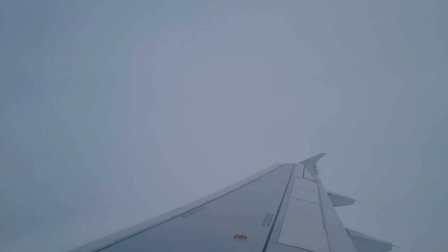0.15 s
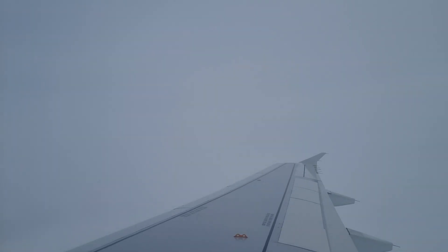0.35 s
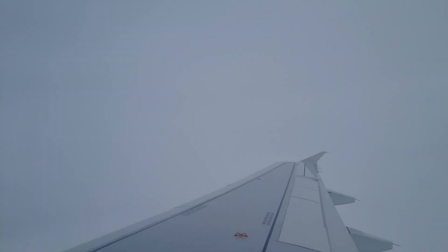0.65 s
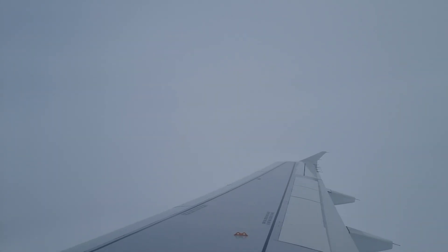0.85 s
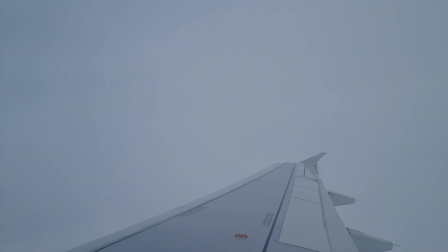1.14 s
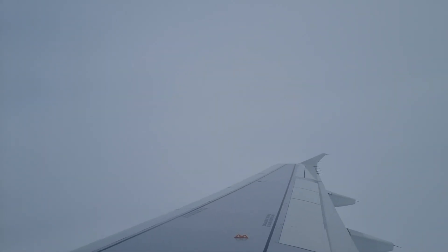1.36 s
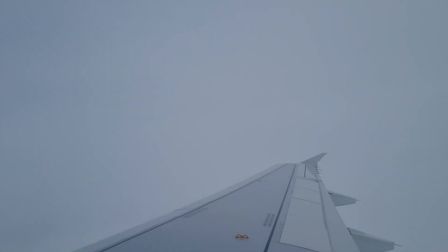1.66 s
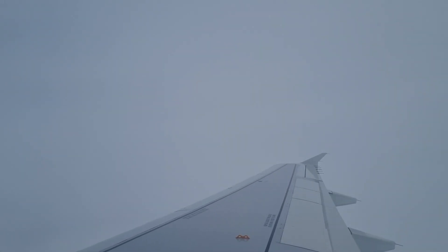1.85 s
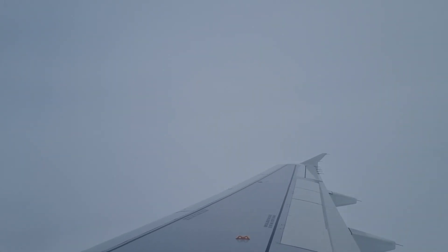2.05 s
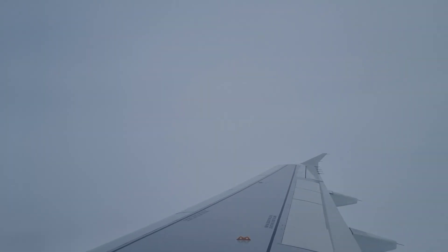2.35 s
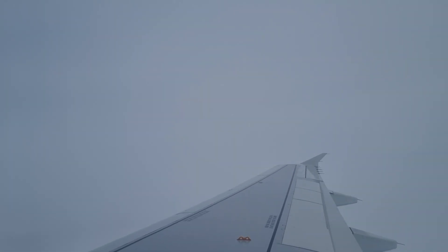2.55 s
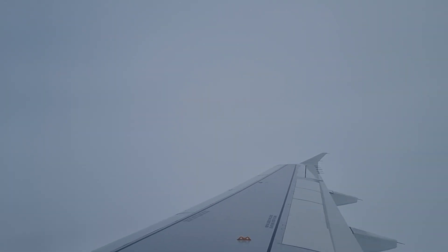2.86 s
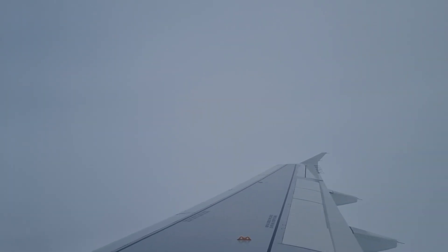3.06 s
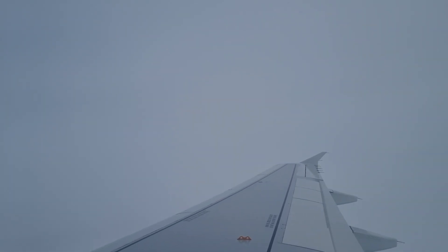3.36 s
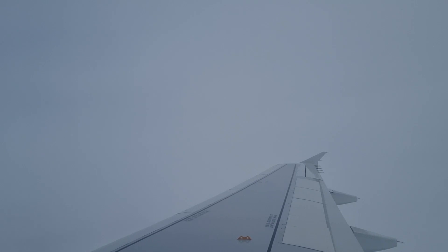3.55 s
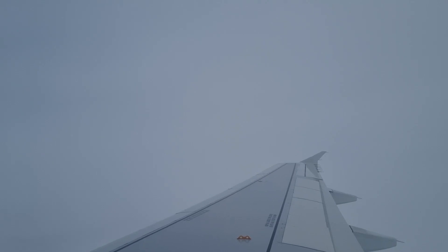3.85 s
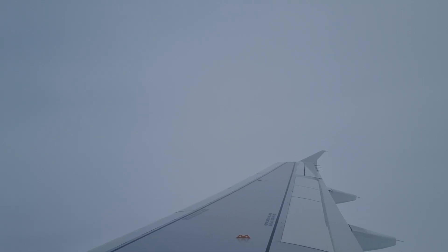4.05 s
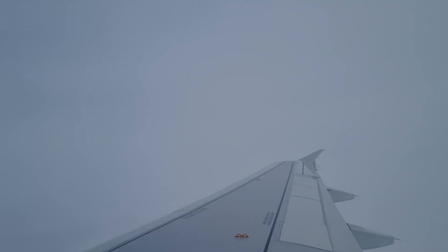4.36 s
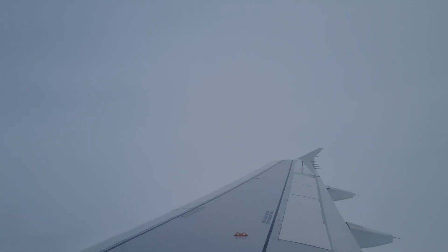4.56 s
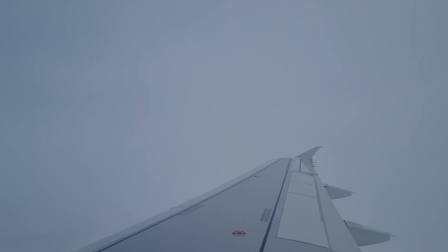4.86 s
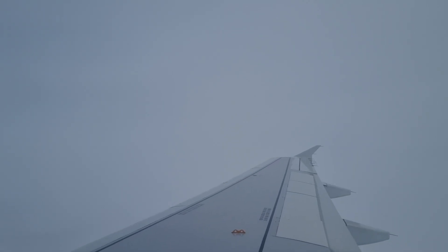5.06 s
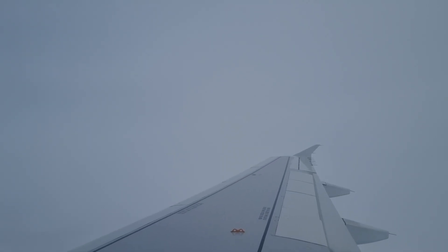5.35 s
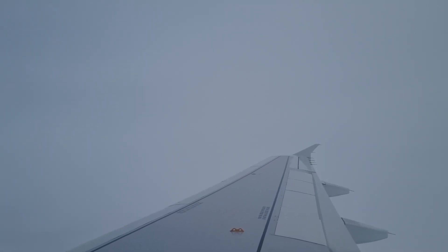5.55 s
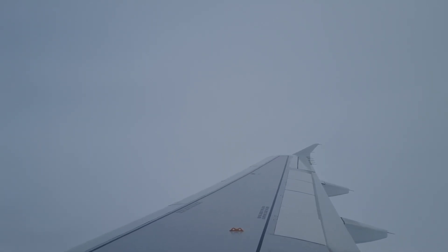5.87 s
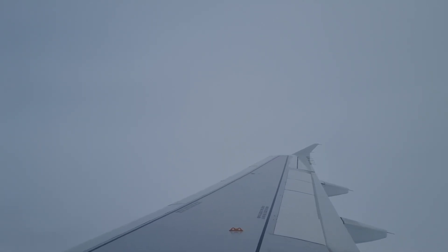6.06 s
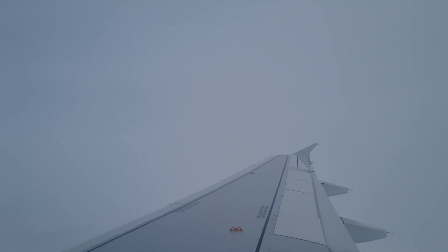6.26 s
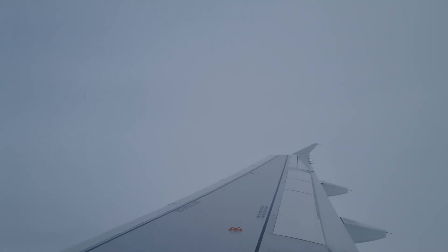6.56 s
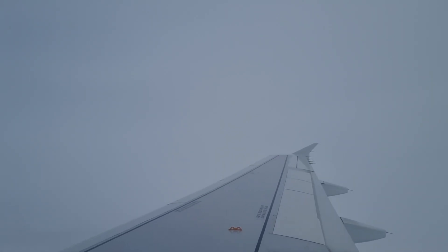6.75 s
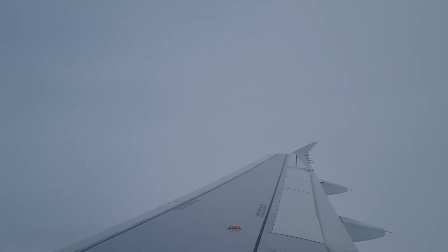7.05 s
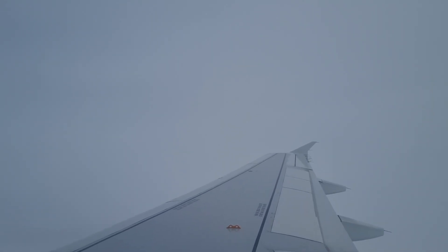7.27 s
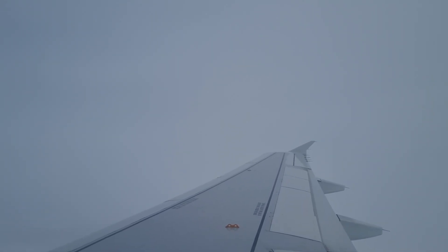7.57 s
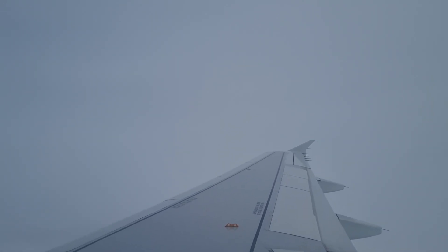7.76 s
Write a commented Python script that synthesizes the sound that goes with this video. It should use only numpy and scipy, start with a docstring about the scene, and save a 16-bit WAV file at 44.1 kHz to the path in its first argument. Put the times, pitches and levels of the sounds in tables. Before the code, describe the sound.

For about 8 seconds we hear the inside of an airliner climbing through cloud, from a window seat. A loud, pure, very deep hum around 72 Hz holds steady and dominates, wrapped in dense rumble mostly below 500 Hz. Weaker steady tones near 130, 230 and 530 Hz give a droning, slowly beating colour, with a very faint whine above 1 kHz. Muffled airflow and thin vent hiss lie far underneath, slightly stronger at the start. Tiny soft high swishes pass near 0.1, 0.2, 0.8, 2.2 and 6.9 s. At 5.6 s a short dry scuff close by is followed at 5.7 to 6.0 s by a hissy rubbing stroke of shifting colour, then light touches at 6.0 and 6.3 s and a fainter brush to about 6.5 s. The drone continues unchanged to the end. Close stereo microphones, wide low rumble, no evident echo.

```python
"""The fan shaft hums with its buzz-saw orders inside an airliner cabin during the climb, heard by a window:
sums of sines at shaft multiples, with accessory and core-shaft tones, paired engines beating slowly.
Jet rumble and airflow come through the wall and air vents hiss: shaped noise, partly shared by the ports.
Something is rubbed close by: friction hiss excites resonances by contact place. Faint swishes are short
puffs of band noise. Two microphone ports stand a hand apart."""
import sys
import numpy as np
from scipy import signal
from scipy.fft import rfft, irfft, next_fast_len
from scipy.io import wavfile
from scipy.ndimage import uniform_filter1d, map_coordinates

SR = 44100
rng = np.random.default_rng(int(sys.argv[2]) if len(sys.argv) > 2 else 0)


def unload_audio(sound):
    """Save the sound as a 16-bit wav file, at the path given as the first command line argument."""
    columns = np.transpose(np.atleast_2d(sound))
    # keep every value between -1 and 1, then stretch to whole-number steps
    steps = np.round(np.clip(columns, -1, 1) * 32767)
    wavfile.write(sys.argv[1], SR, steps.astype(np.int16))


N = 348831

# In all tables left_minus_right_db and left_lead_rad compare the two ports; levels in db are rms.
# Fan shaft speed: time_s, speed_hz
FAN_SPEED = [(0, 71.52), (7.91, 71.56)]
# Shaft multiples from uneven blade-tip shocks: order, level_db, left_minus_right_db, left_lead_rad
FAN_ORDERS = [(1, -13.5, -.6, .2), (4, -32, -3, .2), (9, -53, -3, 1.9), (12, -51, 2, 2.9),
              (14, -54, 2, 2.2), (15, -49, 0, 3.1), (16, -60, 1, 3.5), (17, -56, -2, 3.8),
              (22, -64, -5, 3.9), (36, -70, 1, 0), (41, -74, 4, 1.9)]
# Accessory shaft speed: time_s, speed_hz
ACCESSORY_SPEED = [(0, 132.68), (7.91, 132.61)]
# Pump and generator on that shaft: order, level_db, left_minus_right_db, left_lead_rad
ACCESSORY_ORDERS = [(1, -38, -1, .5), (8, -52, 2, 2.9), (9, -41.5, -3, 2.3), (12, -51, -5.5, 3.5),
                    (16, -66, -1, 5)]
# Core shafts and pumps of both engines, nearly in tune: in_step_s, then for each engine
# (pitch_hz, level_db, left_minus_right_db, left_lead_rad)
ENGINE_PAIRS = [(.46, (230.3, -28.8, -3.9, .2), (230.78, -32.9, -.6, .1)), (0, (530.58, -40.7, -4.9, 1.3),
                (531.7, -42, -2.4, 1.6))]
# Steady single tones: pitch_hz, level_db, left_minus_right_db, left_lead_rad
WHINES = [(1288.7, -57, -1, 4.5), (1248.6, -63, 2, 2.7), (1299.4, -61, 8, 1.9), (1449.8, -63, 2, 2.4),
          (1461.6, -66, -6, 2.7), (11999.5, -92, -2, 0), (12800.5, -89, 7, 0)]

# Jet rumble through floor and wall:
# frequency_hz, density_db_per_hz, left_minus_right_db, likeness_0_to_1, left_lead_rad
JET_RUMBLE = [(20, -60.5, -4, .9, .1), (32, -57, -4.5, 0.91, .3), (46.5, -42.5, 0.7, 1, .3),
              (91, -37, -1.3, .98, .2), (139, -43.5, 0, 0.93, .2), (162.4, -38, -1.5, 0.95, .01),
              (202.7, -45.5, -1.7, 1, .1), (250, -47, -3, 0.74, .01), (324, -44, -2, 0.83, .1),
              (412.3, -48.5, -5.5, 0.54, 1.74), (456, -55, 0, 0.3, 1.7), (529, -50, -6.5, .51, 1.27),
              (584, -61, 0, .44, 2.5), (796, -86.5, -5.5, 1, 2.7)]
# Airflow along the skin; a standing wave across the ports turns them against each other: same columns
SKIN_AIRFLOW = [(400, -87, -1, .44, 2.5), (600, -63, -1, 0.37, 2.64), (757, -57.5, 0.5, 0.67, 3.1),
                (962, -63.5, 0, 0.77, 3.1), (1350, -70, 1, 0.62, 3.5), (1450, -74, 1.5, .57, 3.1),
                (2030, -76.5, -3, 0.11, 2.9), (2270, -81.5, -2, .07, 2.8), (2580, -79.5, 2.5, 0.15, .1),
                (3130, -80.5, 0, 0.18, 3.4), (3570, -85.5, -0.2, .21, 3.1), (4050, -90.5, -0.5, .2, 3.1),
                (4500, -105, -0.3, .2, 3.1)]
# Air vents, reaching the left port first: same columns
AIR_VENTS = [(3000, -105, -1.5, .2, .1), (3900, -87.5, -1.5, 0.22, .1), (4500, -90.5, -2.5, 0.4, .1),
             (5630, -95.5, -0.5, .27, .1), (6400, -93.5, -1, .25, .1), (6900, -95.5, 1.8, .3, .1),
             (7600, -95.5, -1.8, .2, .1), (8660, -99.5, 6, .2, .1), (10100, -102, 2.5, .2, .1),
             (11000, -106, -2.5, .2, .1), (11800, -107, 1, .2, .1), (12400, -104, 1, .2, .1),
             (15700, -108, 2.5, .16, .1)]
VENT_LEAD_S = 0.000563
# Slow drift of airflow and vents: time_s, level_db
FLOW_DRIFT = [(0, 0.85), (1.5, 0.2), (3.5, -0.43), (5.5, 0.04), (7.91, 0.1)]

# Relative spectrum of the friction hiss: frequency_hz, density_db_per_hz
FRICTION_SPECTRUM = [(1200, -25.5), (3300, 3.5), (5000, -2), (8500, -4.5), (10000, -7.5), (12500, -7.5),
                     (15500, -10)]
# Resonances of the rubbed thing, relative levels:
# pitch_hz, width_hz, level_db, left_minus_right_db, best_place_0_to_1
RESONANCES = [(1900, 150, 3.5, -3, 0.6), (3420, 320, 5, -3.5, 0.2), (3700, 250, 1, 0, .5),
              (4780, 300, 0, -4, 0.7), (5200, 400, -3.5, 0, 0.9), (5740, 400, 2, -5, 0.2),
              (6300, 550, -2, -5, 0.9), (7700, 650, 0, -4, 0.72), (8500, 740, 2.5, 4.5, .05),
              (8820, 450, 1.5, 6, .5), (10300, 320, -7, -2, .8), (11000, 500, -2, 3.5, .2),
              (12200, 400, -4.5, -2.5, .75), (12600, 900, 0.5, -1.5, .05), (13700, 750, 1.5, 0.5, .55),
              (14500, 800, 0, 4, .4), (15200, 500, -4, 2, .55)]
# Strokes: start_s, length_s, peak_level_db, first_place_0_to_1, last_place_0_to_1
RUB_STROKES = [(5.638, .026, -41.5, .05, .08), (5.72, .25, -46.5, .4, 0.98), (6.03, .015, -52, .75, .7),
               (6.274, .014, -49, .15, .2), (6.35, .12, -58, .75, .9)]
RING_SHARE, RING_PER_S = .4, 1.5  # power share of ringing: base, and growth per s of stroke length
REACH = 0.38  # distance from the best place, 0-1, at which a resonance's drive falls to 1/e
SLIP_DB, FLICKER_DB = 0.9, 2.2  # level variation: stick and slip; each resonance on its own
PRESS_S, LIFT_S = .024, .018  # Gaussian rise before a stroke, exponential fall after it
ARCH_DB_PER_S = 16  # drop from the middle of a stroke to its ends, per s of length

# Faint swishes: peak_s, length_s, centre_hz, peak_level_db
SWISHES = [(0.074, .04, 12970, -59), (.23, .05, 8500, -59), (.77, .065, 6500, -59),
           (0.863, .02, 13000, -68), (2.17, .06, 7500, -58), (3.109, .02, 12900, -65),
           (6.87, .07, 7970, -63), (7.814, .03, 11000, -61)]
SWISH_BAND, SWISH_PAN_DB = .4, -1  # band scale over centre frequency; left minus right
# Chance swishes: mean rate, then typical length, centre frequency and peak rms level
STRAY_PER_S, STRAY_S, STRAY_HZ, STRAY_DB = 1, .04, 8000, -69

TOP_HZ = 15750


def engines():
    """Periodic sources radiate line spectra: rotation gives harmonic orders, other parts give single tones."""
    t = np.arange(N) / SR
    fan_hz, = columns(FAN_SPEED, t)
    accessory_hz, = columns(ACCESSORY_SPEED, t)
    hum = tones(FAN_ORDERS[:1], fan_hz, waver_db=.2, waver_rad=.05, rate=1.5)
    buzz = tones(FAN_ORDERS[1:], fan_hz, waver_db=.8, waver_rad=.2, rate=1.5)
    accessories = tones(ACCESSORY_ORDERS, accessory_hz, waver_db=.8, waver_rad=.15, rate=2.5)
    # on a 1 Hz base, the order is the pitch in Hz
    whines = tones(WHINES, np.ones(N), waver_db=1, waver_rad=.15, rate=2.5)
    return hum + buzz + accessories + twins() + whines


def tones(rows, base_hz, waver_db, waver_rad, rate):
    """Harmonic synthesis: multiples of a base speed waver in level and phase through the structure."""
    phase = 2 * np.pi * np.cumsum(base_hz) / SR
    out = np.zeros((2, N))
    for order, db, pan_db, lead in rows:
        turn = order * phase + rng.uniform(0, 2 * np.pi) + waver_rad * wobble(rate)
        size = np.sqrt(2) * amp(db) * unit(amp(waver_db * wobble(rate)))
        out += size * ports(pan_db)[:, None] * np.sin([turn + lead / 2, turn - lead / 2])
    return out


def twins():
    """Interference of two engines a fraction of a hertz to about one hertz apart: a slow beat."""
    out = np.zeros((2, N))
    for in_step_s, *pair in ENGINE_PAIRS:
        t = np.arange(N) / SR - in_step_s
        start = rng.uniform(0, 2 * np.pi)
        for hz, db, pan_db, lead in pair:
            turn = 2 * np.pi * hz * t + start
            out += np.sqrt(2) * amp(db) * ports(pan_db)[:, None] * np.sin([turn + lead / 2, turn - lead / 2])
    return out


def air():
    """Turbulence radiates broadband noise: rumble, skin airflow and vents, each drifting slowly."""
    flow_db, = columns(FLOW_DRIFT, np.arange(N) / SR)
    rumble = amp(0.9 * wobble(1.1)) * rush(JET_RUMBLE, patchy_db=0.5, walls_db=0)
    skin = amp(flow_db + 0.24 * wobble(0.84)) * rush(SKIN_AIRFLOW, patchy_db=0.78, walls_db=0.95)
    vent_gain = amp(flow_db + .3 * wobble(2.6) + .4 * wobble(13))
    vents = vent_gain * rush(AIR_VENTS, patchy_db=1.5, walls_db=1.6, lead_s=VENT_LEAD_S)
    return rumble + skin + vents


def rush(rows, patchy_db, walls_db, lead_s=0):
    """Partial coherence: each port hears a phase-shifted shared noise and an independent one."""
    z = signal.stft(rng.standard_normal((3, N)), nperseg=1024)[2]
    # random patches, smoothed over frequency and then time
    field = uniform_filter1d(rng.standard_normal(z.shape[1:]), 6, 0)
    field = uniform_filter1d(field, 10, 1)
    # reflections add fixed ripples over frequency
    ripples = uniform_filter1d(rng.standard_normal((3, z.shape[1], 1)), 3, 1)
    z *= amp(walls_db * unit(ripples))
    patchy = signal.istft(z * amp(patchy_db * unit(field)), nperseg=1024)[1][:, :N]
    shared, *own = unit(patchy)

    def colour(hz, common):
        """Coherence divides the spectral power between shared and independent noise."""
        db, pan_db, alike, lead = on_log_hz(rows, hz)
        alike = np.clip(alike, 0, 1)
        gain = amp(db) * np.sqrt(SR / 2) * ports(pan_db)
        if not common:
            return gain * np.sqrt(1 - alike)
        turn = lead / 2 + np.pi * hz * lead_s
        return gain * np.sqrt(alike) * np.exp(1j * np.array([turn, -turn]))

    together = filtered(shared, lambda hz: colour(hz, True))
    return together + filtered(np.array(own), lambda hz: colour(hz, False))


def rubbing():
    """Friction excites modes: as the contact slides along, it wakes one resonance after another."""
    hiss, fresh = (from_left(lambda hz: amp(on_log_hz(FRICTION_SPECTRUM, hz)[0])) for _ in range(2))
    begin = round((RUB_STROKES[0][0] - 4 * PRESS_S) * SR)
    end = round((sum(RUB_STROKES[-1][:2]) + 6 * LIFT_S) * SR)
    near = np.arange(begin, end)  # samples spanning the strokes
    t, f = near / SR, np.fft.rfftfreq(len(near), 1 / SR)
    grain = amp(SLIP_DB * wobble(140)[near])  # the contact sticks and slips
    spectrum = rfft(hiss[:, near])
    modes = []
    for hz, width_hz, _, pan_db, _ in RESONANCES:
        band = (1j * f * width_hz / (hz * hz - f * f + 1j * f * width_hz)) ** 2
        mode = unit(irfft(spectrum * band, len(near)))
        modes.append(amp(FLICKER_DB * wobble(25)[near]) * ports(pan_db)[:, None] * mode)

    out = np.zeros((2, N))
    for s, length, db, first, last in RUB_STROKES:
        u = np.clip((t - s) / length, 0, 1)  # progress through the stroke
        place = first + (last - first) * u
        drive = np.array([amp(mode_db) * np.exp(-((place - best) / REACH) ** 2)
                          for _, _, mode_db, _, best in RESONANCES])
        ring = sum(d * m for d, m in zip(drive, modes)) / np.linalg.norm(drive, axis=0)
        share = np.clip(RING_SHARE + RING_PER_S * length, 0, 1)
        press = (np.minimum(t - s, 0) / PRESS_S) ** 2
        lift = np.maximum(t - s - length, 0) / LIFT_S
        level = np.exp(-press - lift) * amp(db - ARCH_DB_PER_S * length * (2 * u - 1) ** 2)
        out[:, near] += level * grain * (np.sqrt(1 - share) * fresh[:, near] + np.sqrt(share) * ring)
    return out


def from_left(response):
    """Path difference: a nearby source's shared part reaches the left port first; the rest is scattered."""
    delay = 24  # samples
    shared = rng.standard_normal(N + delay)
    direct = np.array([shared[delay:], shared[:N]])
    return unit(filtered(0.48 * direct + rng.standard_normal((2, N)), response))


def swishes():
    """Band-limited noise under a Gaussian envelope: soft puffs of high hiss swell and fade."""
    out, noise = np.zeros((2, N)), rng.standard_normal((2, N))
    peaks_s = np.cumsum(rng.exponential(size=40)) / STRAY_PER_S
    stray = [(s, STRAY_S * np.exp(.5 * a), STRAY_HZ * np.exp(.2 * b), STRAY_DB + 2 * c)
             for s, (a, b, c) in zip(peaks_s, rng.standard_normal((40, 3))) if s < N / SR]
    for s, length, hz, db in SWISHES + stray:
        t = np.arange(max(round((s - 2 * length) * SR), 0), min(round((s + 2 * length) * SR), N))
        f = np.fft.rfftfreq(len(t), 1 / SR)
        band = np.exp(-2 * ((f - hz) / (SWISH_BAND * hz)) ** 2)
        puff = unit(irfft(rfft(noise[:, t]) * band, len(t)))
        envelope = np.exp(-4 * ((t / SR - s) / length) ** 2)
        out[:, t] += puff * envelope * amp(db) * ports(SWISH_PAN_DB)[:, None]
    return out


def amp(db):
    """Decibel law: the amplitude gain of a level in dB."""
    return 10 ** (np.asarray(db) / 20)


def unit(x):
    """Power normalisation: x at rms 1."""
    return x / np.sqrt(np.mean(x ** 2) + 1e-20)


def columns(rows, at):
    """Linear interpolation: every column after the first, read at these places."""
    first, *cols = np.transpose(rows)
    return [np.interp(at, first, c) for c in cols]


def on_log_hz(rows, hz):
    """Logarithmic frequency: joins spectrum points, holds the ends for an octave, silent beyond."""
    cols = columns([(np.log(r[0]), *r[1:]) for r in rows], np.log(hz + 1))  # + 1 avoids log of zero
    cols[0][(hz < rows[0][0] / 2) | (hz > rows[-1][0] * 2)] = -200
    return cols


def wobble(rate):
    """Slow random modulation: a smooth curve through rate random knots a second."""
    knots = rng.standard_normal(int(N * rate / SR) + 4)
    return map_coordinates(knots, [np.arange(N) * rate / SR])


def filtered(x, response):
    """Linear filtering: the spectrum of x times a complex response of frequency."""
    m = next_fast_len(N + 8192)
    return irfft(rfft(x, m) * response(np.fft.rfftfreq(m, 1 / SR)), m)[..., :N]


def ports(pan_db):
    """Level difference between ports: left and right gain, half the difference each."""
    return amp(np.array([pan_db / 2, -pan_db / 2]))


def scene():
    """Superposition: all sources add at the two ports."""
    return engines() + air() + rubbing() + swishes()


def record(dry):
    """Saturation and band limiting: tall peaks are rounded off and the top of the spectrum is removed."""
    soft = dry / (1 + np.abs(dry / .97) ** 8) ** (1 / 8)
    ends = np.minimum(np.arange(N), np.arange(N)[::-1]) / (.003 * SR)
    fade = np.sin(np.pi / 2 * np.clip(ends, 0, 1)) ** 2  # 3 ms at both ends, so that neither clicks
    return filtered(soft * fade, lambda hz: hz < TOP_HZ)


dry = scene()
out = record(dry)
unload_audio(out)
```